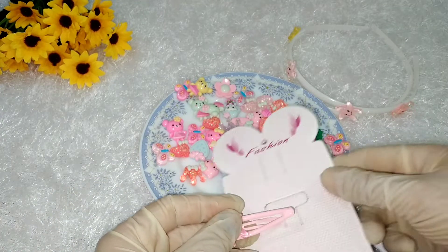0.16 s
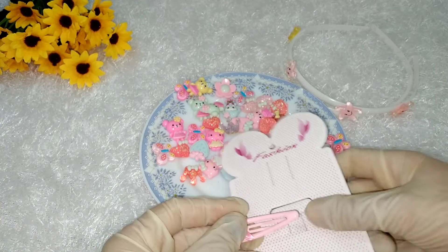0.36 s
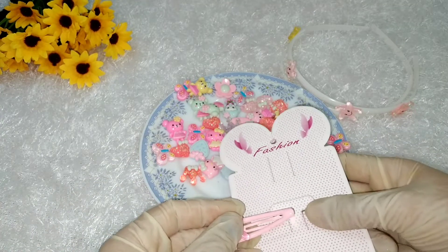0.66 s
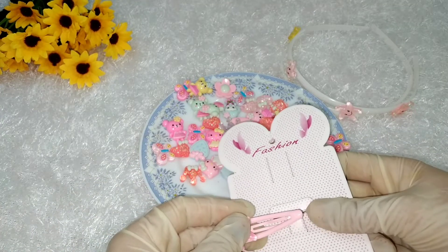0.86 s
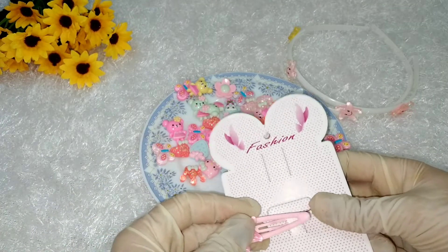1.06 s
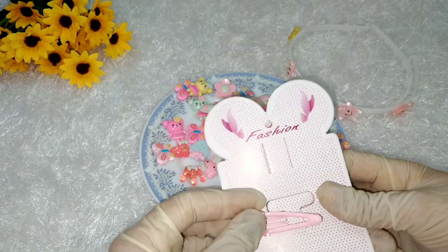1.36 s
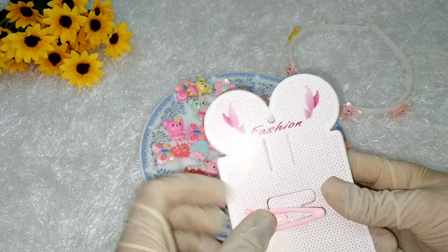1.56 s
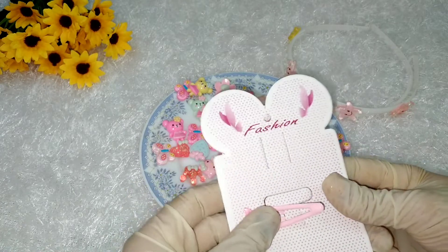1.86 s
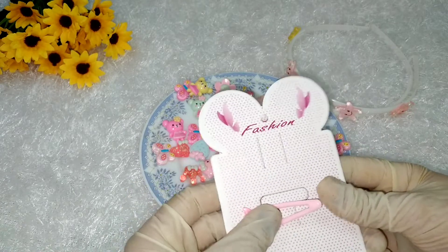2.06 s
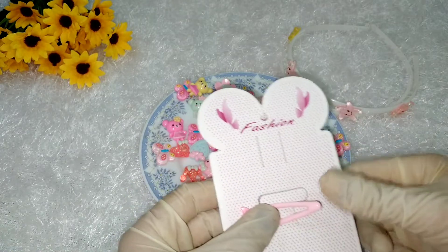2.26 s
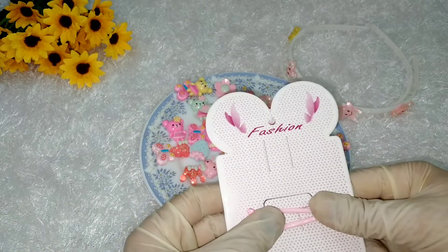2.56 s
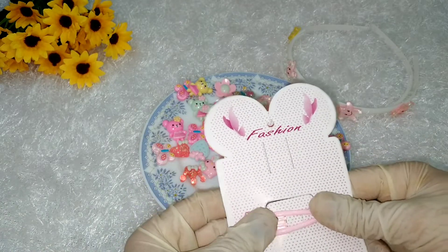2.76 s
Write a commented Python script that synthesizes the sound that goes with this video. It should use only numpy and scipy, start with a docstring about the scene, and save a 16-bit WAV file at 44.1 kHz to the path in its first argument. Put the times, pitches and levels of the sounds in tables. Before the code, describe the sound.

Close, dry handling of a plastic clip on stiff card, with scattered ticks and soft rubs, a dense scraping burst midway, small springy pings later, and a sharp click near the end over low room rumble.

```python
"""A small plastic hair clip scrapes and catches with dry ticks as gloved hands slide it onto a stiff card.
Ticks are flattened noise bursts coloured by filters; card pops and clip rings are sums of dying modes.
Light rubs and one firm slide into the slot are friction noise made of clumped tiny slips.
Close to the microphone in a quiet room, each has a room tail that a noise suppressor soon cuts.
Shaped noise gives a low rumble and faint hiss; a wavering sine gives a faint hum."""
import sys
import numpy as np
from scipy import signal
from scipy.fft import rfft, irfft
from scipy.io import wavfile
from scipy.ndimage import uniform_filter1d

SR = 44100
rng = np.random.default_rng(int(sys.argv[2]) if len(sys.argv) > 2 else 0)


def store_pcm(level_fs):
    """Save levels as 16-bit WAV."""
    pcm = np.round(np.clip(level_fs, -1, 1) * 32767).astype(np.int16)
    wavfile.write(sys.argv[1], SR, np.atleast_2d(pcm).T)


N = 127890

# Centres of the four tick bands: band_hz
TICK_BANDS_HZ = (1000, 3000, 9000, 12000)
# Colour shared by all ticks, added to their band levels: frequency_hz, gain_db
TICK_COLOUR = [(80, 2.5), (300, 3.5), (700, -2), (1200, -3), (1600, 0), (2300, -2.5), (4200, -2),
               (5700, -4), (7000, -6), (9600, -4.5), (10800, -8.5), (12000, -5), (16000, -17.5)]
# Stereo image of the handling sounds, also used by the modes, friction and room:
# frequency_hz, likeness (correlation of left and right), left_over_right_db
HANDLING_STEREO = [(204, 0.87, 0.5), (910, 0.95, -3.5), (1930, 0.63, -0.5), (3040, 0.1, -.5),
                   (5100, -0.29, 1), (10300, -0.23, -0.5)]
TICK_RISE_S = 0.0014


def tick(bands_db, decay_s, size=2048):
    """Impulsive release: a catch lets go in a short noise burst, coloured by the card."""
    t, hz = np.arange(size) / SR, freqs(size)
    envelope = (1 - np.exp(-t / TICK_RISE_S)) * np.exp(-t / decay_s)
    spectra = rfft(rng.standard_normal((2, size)) * envelope)
    flat = []
    for spectrum in spectra:
        power = uniform_filter1d(abs(spectrum) ** 2, size=90)
        flat.append(spectrum * causal(-10 * np.log10(power + 1e-12)))
    colour_db = read(list(zip(TICK_BANDS_HZ, bands_db)), hz) + read(TICK_COLOUR, hz)
    burst = irfft(spread(*flat, hz, HANDLING_STEREO) * causal(colour_db))
    return burst * np.cos(np.pi / 2 * t / t[-1]) ** 2  # fades to silence at the end


# start_s, level_1khz_db, level_3khz_db, level_9khz_db, level_12khz_db, decay_s, room_db,
# hold_s (time before the suppressor cuts the room tail)
TICKS = [(.0620, -22.5, -35, -38, -64, .0015, -13.5, 0.016), (0.145, -28, -36, -44, -58, .0012, 1, 0.035),
         (0.4917, -19.5, -16, -19, -44, 0.0022, 1.5, 0.051), (1.04, -32, -60, -53, -49, 0.0011, -1, 0.03),
         (1.0775, -22, -23.5, -40, -61, 0.00082, 0, 0.016),
         (1.2384, -18.5, -41, -41, -58, .0012, -8.5, 0.05),
         (1.276, -17.5, -15.5, -12.5, -28, 0.00087, -15, 0.005),
         (1.2872, -35, -27, -46, -56, 0.0004, -6, .01), (1.3585, -47, -30.5, -52, -55, 0.00055, 2, .01),
         (1.511, -12.5, -19, -48, -52, 0.0018, -5, .04), (1.5200, -15, -18, -11, -34, 0.00039, -15, 0.029),
         (1.523, -22.5, -11.5, -36, -30, 0.0017, -10, 0.054),
         (1.538, -39, -26, -22, -40, .0003, 11.5, 0.053),
         (1.5463, -14.5, -12.5, -16, -34, 0.0015, -2, 0.047),
         (1.5496, -20.5, -7.5, -15.5, -37, 0.0011, -8, 0.062),
         (1.562, -15, -9.5, -23, -45, 0.0031, -17, 0.016), (1.5690, -16, -28, -19, -36, 0.0013, -11, 0.045),
         (1.584, -26, -28, -21, -39, 0.0036, -13, 0.0096), (1.5895, -49, -13, -32, -44, 0.0015, -9, 0.0046),
         (2.006, -28, -53, -46, -64, 0.0036, -12, .01), (2.097, -18, -20.5, -21, -57, 0.0014, 2, 0.046),
         (2.1343, -17.5, -26.5, -32, -52, 0.00078, 4.5, 0.0055),
         (2.1847, -40, -27, -40.5, -56, 0.0015, 13, .035),
         (2.2297, -29.5, -33.5, -46, -60, 0.00065, 12.5, 0.028),
         (2.2394, -43, -29.5, -40, -59, 0.0012, 10, .021),
         (2.7283, -21.5, -11.5, -24, -49, 0.0013, 0.5, 0.059),
         (2.7458, -14, -18, -17, -40, 0.00041, -5, 0.03), (2.748, -6.5, -28, -28, -44, 0.0022, -6, 0.046),
         (2.7489, -14, -10.5, -16, -28, 0.0018, -3.5, 0.028),
         (2.833, -29, -56, -65, -68, 0.00069, -8, .006)]


def ticks():
    """Stick-slip: edges of clip and card catch and release."""
    out = np.zeros((2, N))
    for start_s, *bands_db, decay_s, room_db, hold_s in TICKS:
        add(out, start_s, room(tick(bands_db, decay_s), room_db, hold_s))
    return out


# Rising and falling level of the firm slide into the slot, joined by straight lines: time_s, level_db
SLIDE = [(1.475, -73.5), (1.504, -53.5), (1.53, -58), (1.545, -50), (1.57, -58.5), (1.587, -50),
         (1.596, -57), (1.62, -84), (1.66, -92)]
# Light rubs of glove and clip on the card: peak_s, rise_s, fall_s, level_db, tilt_db_per_octave
RUBS = [(.03, 0.018, .02, -72.5, -5), (.063, 0.014, 0.0086, -60, -1.5), (0.121, 0.013, 0.011, -58.5, -2.5),
        (0.324, 0.009, 0.0072, -59.5, -.5), (.39, 0.13, 0.14, -69, -6), (.77, 0.034, 0.034, -76.5, -4),
        (0.869, .02, 0.035, -75, 0), (.930, .011, 0.0057, -55.5, 0), (1.087, 0.011, 0.0066, -65.5, 0.5),
        (1.211, 0.065, 0.018, -75.5, 0.5), (1.268, 0.023, 0.017, -56.5, 1), (1.399, .015, 0.028, -69, 3),
        (1.68, 0.022, 0.056, -86, 13), (1.91, 0.038, 0.012, -69.5, -4), (2.071, 0.021, 0.06, -76.5, 3),
        (2.765, 0.0049, 0.007, -64, 3)]
RUB_ROOM_DB, RUB_HOLD_S = -9, 0.015


def rubbing(size=16384):
    """Sliding contact: light rubs swell and fade exponentially; one firm slide follows a level curve."""
    out, t = np.zeros((2, N)), np.arange(size) / SR
    for peak_s, rise_s, fall_s, level_db, tilt_db in RUBS:
        start_s = max(peak_s - t[-1] / 2, 0)
        from_peak_s = start_s + t - peak_s
        time_constants = np.maximum(-from_peak_s / rise_s, from_peak_s / fall_s)
        add(out, start_s, friction(level_db - 20 * np.log10(np.e) * time_constants, tilt_db))
    times_s, levels_db = np.transpose(SLIDE)
    slide_db = np.interp(times_s[0] + t, times_s, levels_db, right=-np.inf)  # silent after its end
    add(out, times_s[0], friction(slide_db, tilt_db=0.3))
    return room(out, RUB_ROOM_DB, RUB_HOLD_S)[:, :N]


# Relative colour of friction on the card: frequency_hz, gain_db
FRICTION_COLOUR = [(100, -19.5), (400, 9.5), (700, -4.5), (1200, 2.5), (1600, -1), (1950, 2), (2400, -1.5),
                   (3300, 2), (4800, -2.5), (6800, -7.5), (8800, -4), (10800, -19), (16000, -30)]
GRAINS_PER_S, GRAIN_SPREAD_DB = 1600, 2  # average rate of slips; scale of their uneven sizes
SMOOTH_SHARE = 0.54  # share of the power in smooth hiss
CLUMP_DB, CLUMP_S = 2, 0.0027  # rms swing of the clumps; smoothing time


def friction(level_db, tilt_db):
    """Granular friction: tiny slips of uneven size come in clumps over a smooth hiss."""
    size = len(level_db)
    hz = freqs(size)
    sizes_db = GRAIN_SPREAD_DB * np.minimum(rng.exponential(1, size), 4)
    slips = (rng.random(size) < GRAINS_PER_S / SR) * amp(sizes_db)
    drift = uniform_filter1d(rng.standard_normal(size), size=round(CLUMP_S * SR))
    clumps = amp(CLUMP_DB * unit(drift))
    grain = np.sqrt(SMOOTH_SHARE + (1 - SMOOTH_SHARE) * unit(slips) ** 2)
    drive = unit(clumps * rng.standard_normal((2, size)) * grain)
    colour = amp(read(FRICTION_COLOUR, hz) + tilt_db * np.log2(np.maximum(hz, 500)))
    spectra = spread(*rfft(drive), hz, HANDLING_STEREO) * unit(colour)
    return irfft(spectra, size) * amp(level_db)


# Low modes of the card: ratio (to the pop's pitch), t60_share (of the pop's t60)
CARD_LOW = [(1.002, 1), (1.38, 0.92), (2.0, 0.94)]
# Stiff overtones of the card: ratio (to the pop's pitch), level_db (added to overtones_db), t60_s
CARD_HIGH = [(5.55, 0.5, .017), (8.43, -1, 0.012), (14.2, -7, 0.0062), (23.2, -7, 0.0047)]
# Card pops, whose pitch and damping follow the grip; pitch and t60 are scaled by the modes:
# start_s, pitch_hz, t60_s, first_mode_db, second_mode_db, third_mode_db, overtones_db, room_db, hold_s
POPS = [(0.4936, 438, 0.012, -34, -41.5, -56, -37, -2.5, 0.048),
        (1.079, 357, 0.023, -45.5, -58.5, -53, -57.5, -15, 0.017),
        (1.5, 334, 0.062, -45.5, -46.5, -56, -55, -20, 0.043),
        (2.0990, 236.3, 0.063, -30, -34.5, -44, -40.5, -16, 0.058),
        (2.7304, 466, 0.017, -25.5, -61, -28, -49, -4, 0.043),
        (2.7500, 297, 0.042, -35, -65, -43, -56, -11, 0.024),
        (2.758, 78, .06, -35, -59, -57, -65, -10, .03)]


def card_pops():
    """Plate modes: the card flexes and springs back in a dull, short ring with a few stiff overtones."""
    out = np.zeros((2, N))
    for start_s, pitch_hz, t60_s, *low_db, overtones_db, room_db, hold_s in POPS:
        modes = []
        for (ratio, t60_share), level_db in zip(CARD_LOW, low_db):
            modes.append((pitch_hz * ratio, level_db, t60_s * t60_share))
        for ratio, level_db, high_t60_s in CARD_HIGH:
            modes.append((pitch_hz * ratio, overtones_db + level_db, high_t60_s))
        add(out, start_s, room(ring(modes), room_db, hold_s))
    return out


CLIP_MODES = [(1, -1, 0.03), (1.23, 6, 0.011), (1.62, -22, .014), (1.95, -9, 0.017), (2.33, -9, 0.024),
              (2.74, -7.5, 0.029), (3.73, -8.5, 0.044), (4.8, -26, 0.024), (6.02, -28, 0.052)]
RINGS = [(2.1845, 1640, -49.5, -0.5, -1, 0.027), (2.2305, 1570, -54, -1.5, 2.5, 0.027),
         (2.2388, 1650, -51, -23, 11, 0.016)]


def clip_rings():
    out = np.zeros((2, N))
    for start_s, pitch_hz, level_db, tilt_db, room_db, hold_s in RINGS:
        modes = []
        for ratio, mode_db, t60_s in CLIP_MODES:
            modes.append((pitch_hz * ratio, level_db + mode_db + tilt_db * np.log2(ratio), t60_s))
        add(out, start_s, room(ring(modes), room_db, hold_s))
    return out


def ring(modes, size=6000):
    """Modal decay: sines die exponentially, with left and right out of step by the stereo likeness."""
    t, out = np.arange(size) / SR, np.zeros((2, size))
    ears = np.array([[1], [-1]])
    for hz, level_db, t60_s in modes:
        lag = np.arccos(np.clip(read(HANDLING_STEREO, hz), -1, 1)) / 2  # radians each way
        side_db = read(HANDLING_STEREO, hz, axis=2) / 2
        decay = amp(level_db + ears * side_db - 60 * t / t60_s)
        onset = np.minimum(2 * hz * t, 1)  # half a cycle
        out += decay * np.sin(2 * np.pi * hz * t + ears * lag) * onset
    return out


# Colour of the reflections: frequency_hz, gain_db
ROOM_COLOUR = [(100, -25), (500, -2), (1000, -3.5), (2500, -2), (6000, -3.5), (10000, -4), (16000, 6)]
ROOM_ONSET_S, ROOM_T60_S = 0.0062, 0.42
CUT_RELEASE_S, CUT_DB = 0.0041, -17.5  # time constant and depth of the suppressor's cut


def room(x, room_db, hold_s, size=8192):
    """Diffuse reverberation: a dense room tail, held briefly, then cut faint by a noise suppressor."""
    t, hz = np.arange(size) / SR, freqs(size)
    noise = rfft(rng.standard_normal((2, size)))
    taps = irfft(spread(*noise, hz, HANDLING_STEREO) * amp(read(ROOM_COLOUR, hz)))
    shape = np.minimum(t / ROOM_ONSET_S, 1) ** 2 * amp(-60 * t / ROOM_T60_S)
    cut = np.maximum(np.exp(-np.maximum(t - hold_s, 0) / CUT_RELEASE_S), amp(CUT_DB))
    wet = signal.fftconvolve(x, taps * cut * shape / np.linalg.norm(shape), axes=1)
    return np.pad(x, ((0, 0), (0, size - 1))) + amp(room_db) * wet


# Relative spectrum of room rumble and hiss: frequency_hz, density_db (per Hz)
FLOOR = [(8, 12), (20, 0), (32, -7), (54, -2.5), (78, -13.5), (105, -15.5), (150, -18), (220, -21),
         (330, -24.5), (480, -27.5), (700, -35.5), (1100, -44.5), (1800, -52.5), (3000, -52.5), (6000, -58),
         (8500, -58), (11000, -62), (16000, -63.5)]
# Stereo image of rumble and hiss: frequency_hz, likeness, left_over_right_db
FLOOR_STEREO = [(29, 0.87, -9), (70, 0.29, -8.5), (147, 0.53, -4), (383, 0.48, -2.5), (1210, 0.2, -2),
                (4000, 0.067, -0.5), (12000, 0.042, 0)]
FLOOR_DB, FLOOR_PATCH_DB = -46.5, 0.62  # level; rms swing of the patches


def room_noise():
    """Coloured noise: low rumble and faint hiss with patches that drift in time and frequency."""
    hz = freqs(N)
    spectra = spread(*rfft(rng.standard_normal((2, N))), hz, FLOOR_STEREO)
    noise = unit(irfft(spectra * amp(read(FLOOR, hz)) * np.minimum(hz / 10, 1), N))
    frames = signal.stft(noise, nperseg=1024)[2]
    drift = uniform_filter1d(rng.standard_normal(frames.shape[1:]), size=12, axis=0)
    patches = unit(uniform_filter1d(drift, size=4, axis=1))
    noise = signal.istft(frames * amp(FLOOR_PATCH_DB * patches))[1][:, :N]
    return amp(FLOOR_DB) * noise


# Level of the hum on the right: time_s, level_db (rms)
HUM = [(0, -76), (.25, -58), (.42, -53.5), (.7, -56.5), (.95, -57), (1.2, -64.5), (1.8, -68.5),
       (2.031, -59), (2.3, -67), (2.9, -72.5)]
HUM_HZ, HUM_WAVER_HZ, HUM_LEFT_DB = 108.66, 3.5, -5  # mean pitch; rms waver; left against right


def hum():
    """Frequency modulation: a sine wavers in pitch while its level follows a curve."""
    waver = unit(uniform_filter1d(rng.standard_normal(N), size=4000))
    tone = np.sqrt(2) * np.sin(2 * np.pi * np.cumsum(HUM_HZ + HUM_WAVER_HZ * waver) / SR)
    tone = tone * amp(np.interp(np.arange(N) / SR, *np.transpose(HUM)))
    return tone * amp([[HUM_LEFT_DB], [0]])


def amp(db):
    """Logarithmic level: decibels to amplitude gain."""
    return 10 ** (np.asarray(db) / 20)


def unit(x):
    """Normalisation: scales to rms 1."""
    return x / np.sqrt(np.mean(x ** 2) + 1e-20)


def read(points, hz, axis=1):
    """Interpolation: one column of a table on a log-frequency axis."""
    table = np.array(points, float)
    return np.interp(np.log(hz + 1), np.log(table[:, 0] + 1), table[:, axis])


def freqs(size):
    """Discrete spectrum: bin frequencies in Hz."""
    return np.fft.rfftfreq(size, 1 / SR)


def add(mix, start_s, sound):
    """Superposition: mixes a stereo sound in at a time, cut at the end of the mix."""
    part = mix[:, max(round(start_s * SR), 0):][:, :sound.shape[1]]
    part += sound[:, :part.shape[1]]


def causal(db):
    """Minimum phase: a response with this gain that rings only after the blow."""
    log_gain = np.log(amp(np.concatenate([db, db[-2:0:-1]])))
    return np.exp(np.conj(signal.hilbert(log_gain)))[:len(db)]


def spread(a, b, hz, table):
    """Interchannel correlation: two unrelated spectra become a partly alike left and right."""
    likeness = np.clip(read(table, hz), -1, 1)
    side = amp(read(table, hz, axis=2) / 2)
    shared, apart = a * np.sqrt((1 + likeness) / 2), b * np.sqrt((1 - likeness) / 2)
    return np.array([(shared + apart) * side, (shared - apart) / side])


def scene():
    """Superposition: all handling sounds over the room noise and hum."""
    handling = ticks() + rubbing() + card_pops() + clip_rings()
    return handling + room_noise() + hum()


def record(dry):
    """Low-pass filtering: the recorder's band limit."""
    low_pass = signal.firwin(511, 15900, window=("kaiser", 8), fs=SR)  # cutoff in Hz
    return signal.oaconvolve(dry, low_pass[None], "same")


dry = scene()
out = record(dry)
store_pcm(out)
```